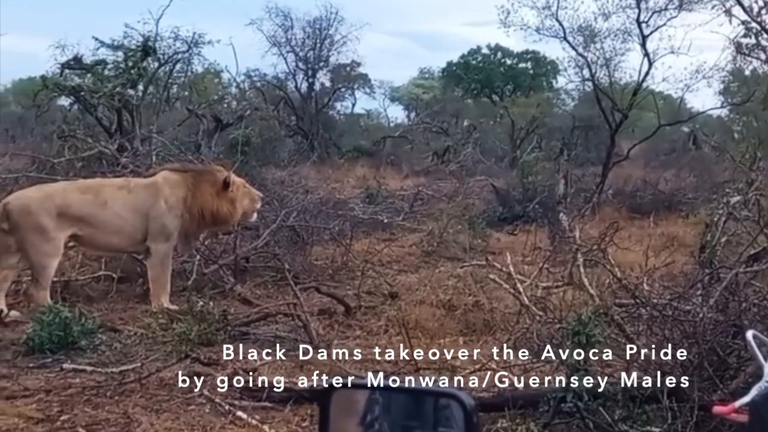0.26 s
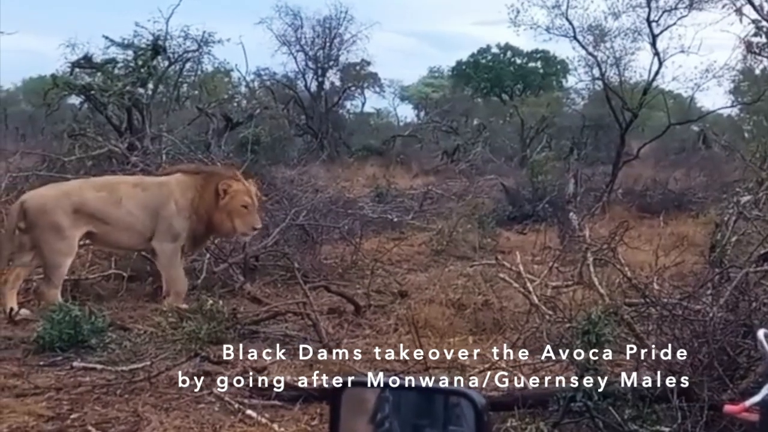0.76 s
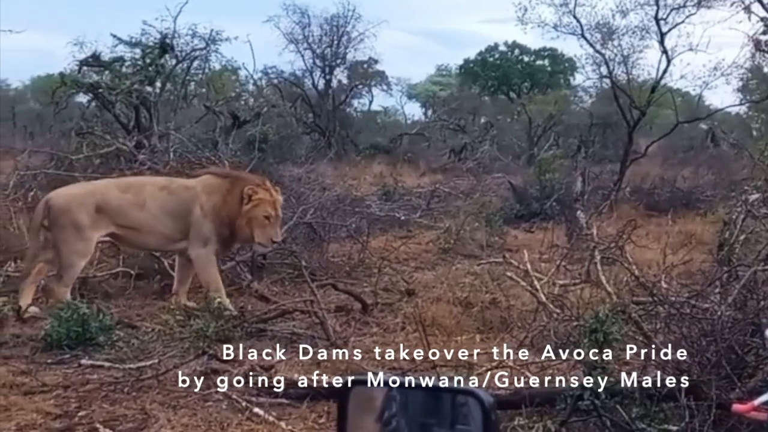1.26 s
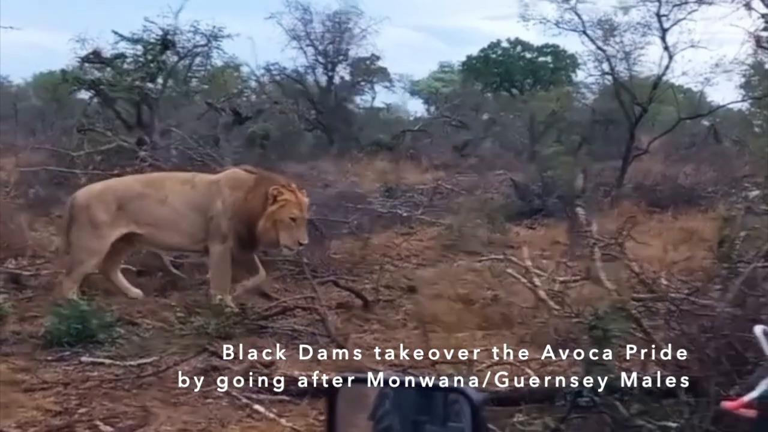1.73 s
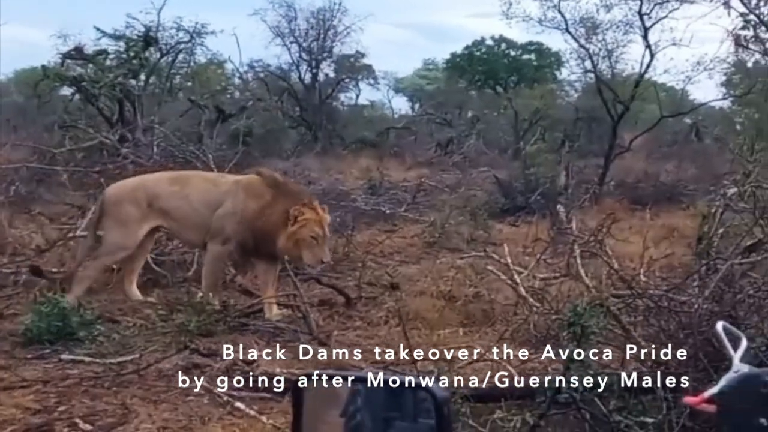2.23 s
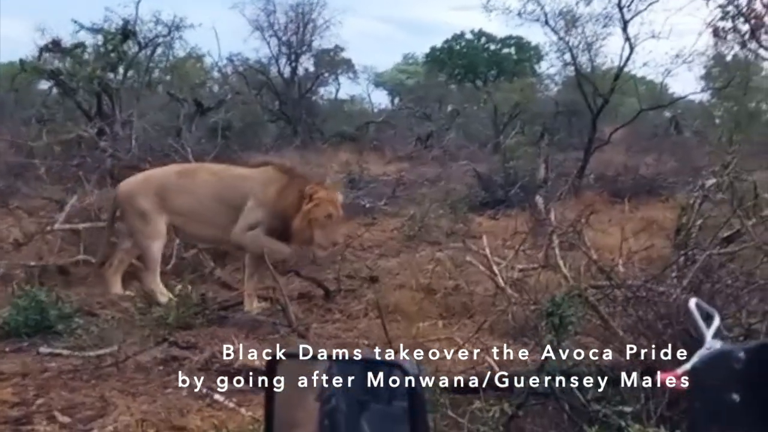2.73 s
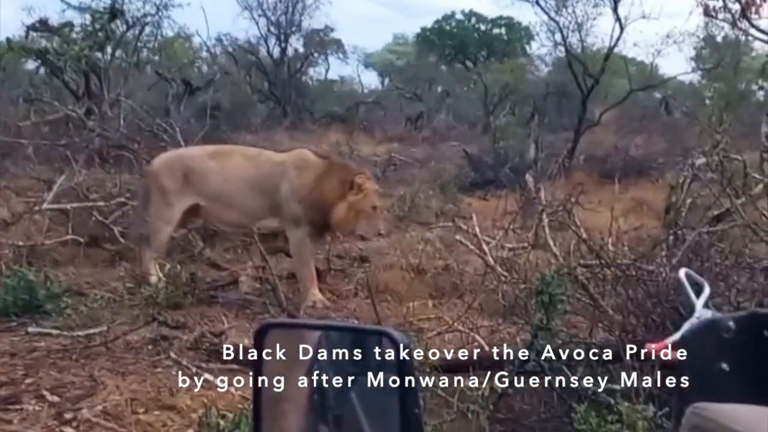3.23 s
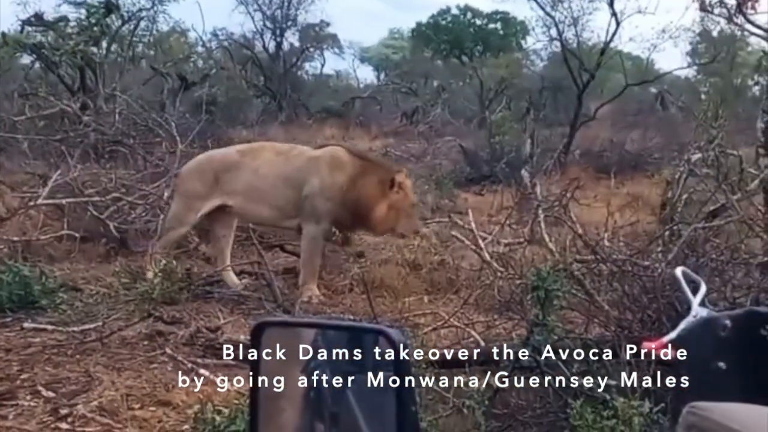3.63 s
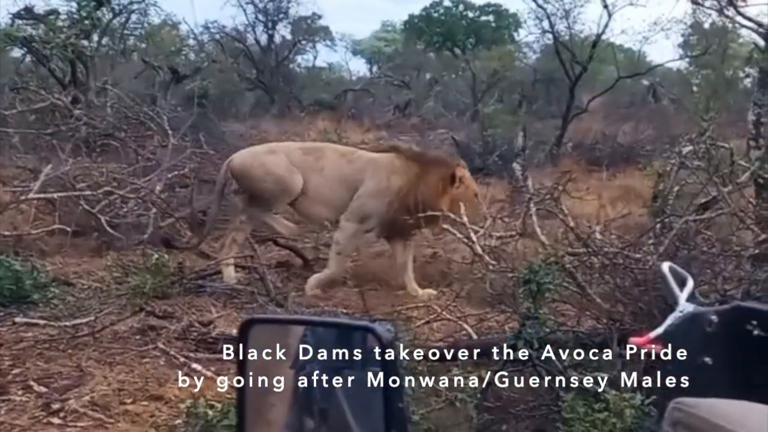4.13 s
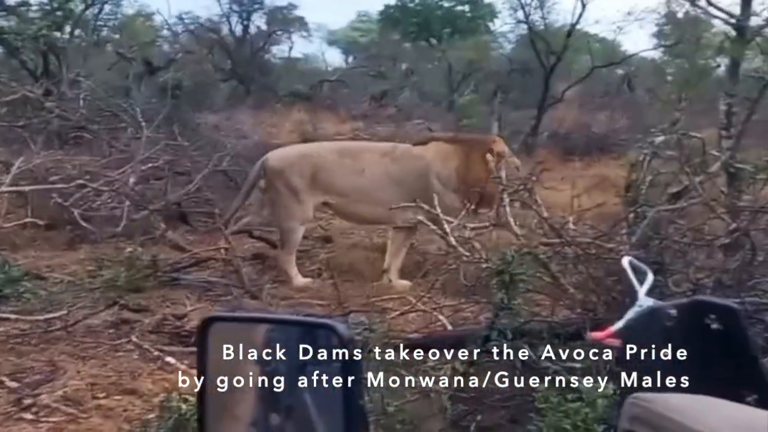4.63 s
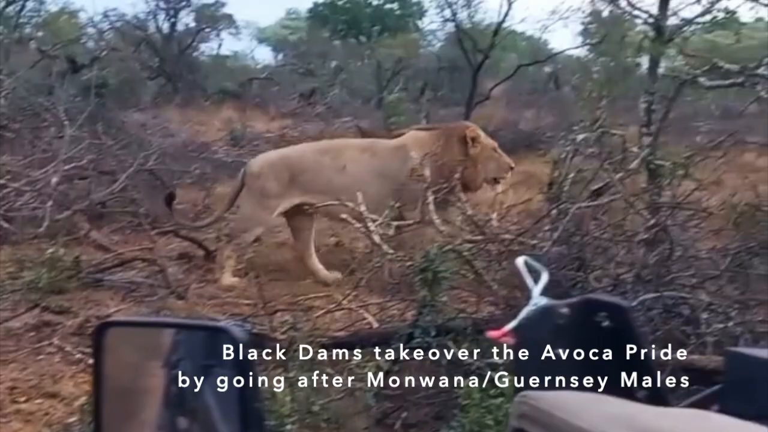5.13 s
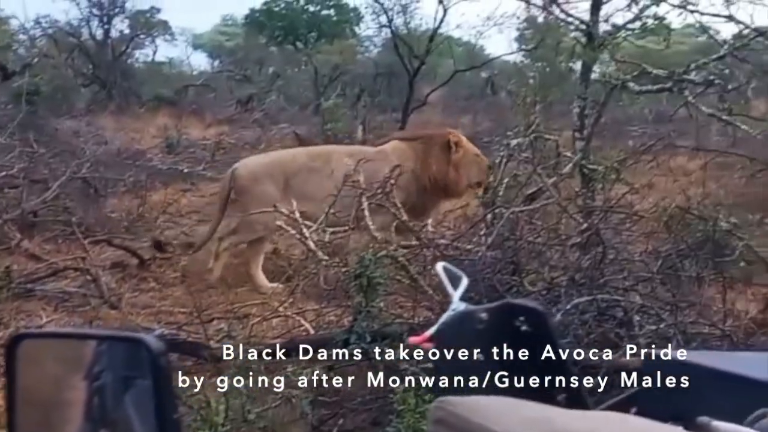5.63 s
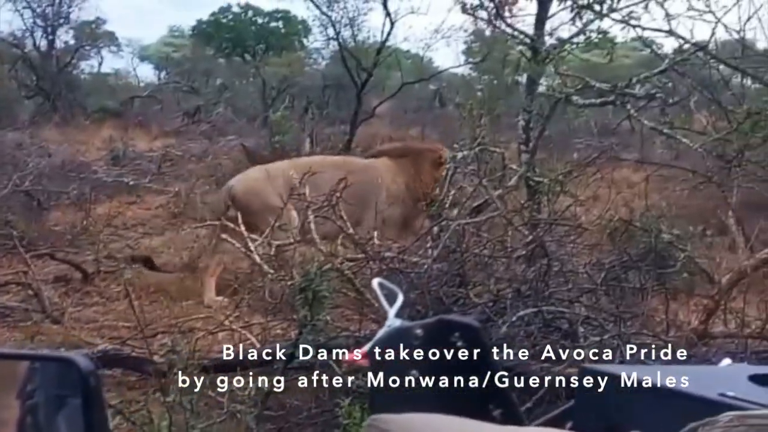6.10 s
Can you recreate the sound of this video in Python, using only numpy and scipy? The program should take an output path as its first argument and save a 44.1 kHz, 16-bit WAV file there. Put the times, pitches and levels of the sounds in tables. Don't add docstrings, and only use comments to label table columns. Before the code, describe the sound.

Close lion voices, deep and smooth in the chest with ragged edges and throaty breath, overlap in bursts with short breaks. First come falling roars and cries, then a coughing grunt, a near pause, an abrupt bark, long sinking roars, and finally a high climbing roar. Small moans and closed-mouth hums fill between. Outdoors, almost dry, with short dull tree echoes, thin insect ringing and soft hush, heard on a small microphone.

```python
import sys
import numpy as np
from scipy import signal
from scipy.fft import rfft, irfft
from scipy.io import wavfile
from scipy.ndimage import uniform_filter1d

SR = 44100
rng = np.random.default_rng(int(sys.argv[2]) if len(sys.argv) > 2 else 0)


def invert_db(level):
    return 10 ** (np.asarray(level, dtype=float) / 20)


def to_wav(s):
    ch = np.atleast_2d(s).T
    pcm = np.round(np.clip(ch, -1, 1) * 32767)
    wavfile.write(sys.argv[1], SR, pcm.astype(np.int16))


N = 280476

# start in seconds, pitch in Hz, chest tone in dB,
# mouth opening in dB against the chest.
LEADER_ROARS = [
    [(0, 188.9, -31.5, -9.5), (.21, 173.7, -26.5, -3), (.33, 163.8, -14.5, -15), (.415, 130.8, -16.5, -9.5),
     (.445, 126.4, -6.5, -21), (.55, 121.7, -9.5, -23), (.615, 107.1, -11, -23.5), (.67, 93.1, -25.5, -20),
     (.77, 105.3, -40, -24)],
    [(1.9, 201.9, -23, -24.5), (2.044, 206.8, -26, -27), (2.186, 173.2, -19, -34),
     (2.29, 153.9, -30.5, -28)],
    [(4.14, 207.3, -18.5, -34), (4.25, 178.1, -16, -37), (4.362, 159.1, -17, -29),
     (4.47, 150.9, -11.5, -32.5), (4.64, 137.2, -16, -33), (4.668, 138, -26, -31),
     (4.7, 132.1, -14.5, -38.5), (4.82, 124.4, -24, -32), (4.885, 122.9, -37, -32)],
    [(5.42, 143.6, -45, -47.5), (5.542, 150.2, -19, -43.5), (5.612, 184, -22.5, -24),
     (5.7, 260.6, -31, -28), (5.79, 274.4, -27.5, -54.5), (6.072, 264, -27, -47.5), (6.24, 277.4, -27, -26),
     (6.3, 285.6, -43.5, -7.5)],
]
# start in seconds, pitch in Hz, chest tone in dB,
# mouth opening in dB against the chest.
PARTNER_ROARS = [
    [(0, 227.2, -34, -14.5), (.21, 210.8, -26.5, -20), (.33, 206.1, -23, -12), (.42, 197.7, -29, -2.5)],
    [(.66, 273.7, -30.5, -18), (.734, 261.7, -36, -25.5), (.816, 253.5, -30, -39),
     (1.05, 217.3, -23.5, -30), (1.098, 221.2, -39.5, -19.5)],
    [(1.1, 220, -41, -11.5), (1.276, 207, -32, -21.5), (1.4, 166.7, -22.5, -31.5),
     (1.616, 156.6, -22.5, -20), (1.648, 149.9, -18.5, -28.5), (1.73, 146.7, -17.5, -36),
     (1.882, 115.5, -21.5, -23), (1.926, 144.3, -26.5, -31), (2.06, 130.6, -20.5, -35.5)],
    [(3.44, 165.9, -51, -16), (3.5, 174.3, -43.5, -10.5), (3.58, 186.1, -40, -15.5),
     (3.694, 203, -47, -26.5), (3.8, 205.4, -35, -23), (4.034, 219, -32, -20), (4.112, 233.4, -20, -31),
     (4.29, 213.7, -15.5, -40), (4.4, 187.3, -39.5, -23.5)],
    [(6.18, 133.4, -25, -32), (6.302, 219.1, -21.5, -24), (6.36, 246.2, -17.5, -29.5)],
]
LEADER_OVERTONE_DB = [-19.5, -20.5, -23, -28]
PARTNER_OVERTONE_DB = [-21.5, -28.5, -21.5, -17, -20]
LEADER_RAGGED = [.12, .28, .27, .04]
PARTNER_RAGGED = [.14, .05, .15, .16, .15]

# start in seconds, pitch in Hz, chest tone in dB,
# mouth opening in dB against the chest.
BARKS = [
    [(2.1, 95.08, -28, -24), (2.145, 96.27, -14.5, -30), (2.26, 95.03, -24, -23), (2.342, 94.1, -35.5, -17),
     (2.42, 98.34, -37.5, -14), (2.53, 93.28, -56, -17.5)],
    [(3.72, 98.7, -22.5, -34.5), (3.76, 102.9, -19, -25), (3.822, 109.4, -8, -28.5),
     (3.86, 102.8, -20, -22.5), (3.9, 103.3, -25.5, -19), (3.97, 103, -48.5, -12)],
]
BARK_OVERTONE_DB = [-15, -16.5]
BARK_RAGGED = [.62, .42]

# start in seconds, length in seconds, peak in dB, first pitch in Hz, last pitch in Hz.
YELPS = [
    (1.09, .37, -32.5, 241.5, 214),
]
MOANS = [
    (.03, .28, -20, 136.8, 128),
    (.925, .335, -24.5, 152, 112),
    (2.655, .255, -23.5, 158, 125.6),
    (3.42, .295, -22, 158, 120.7),
    (5.125, .25, -25, 163.1, 122),
    (5.925, .29, -18.5, 147, 129.8),
]
HUMS = [
    (1.63, .24, -30.5, 274, 313.6),
    (3.38, .115, -31, 211.5, 291.3),
    (3.51, .2, -30.5, 220.5, 312),
    (3.89, .23, -26, 264, 283.3),
]
# start in seconds, length in seconds, peak in dB, first pitch in Hz, last pitch in Hz.
WHINES = [
    (0, .27, -31, 412, 383),
    (.35, 0.099, -22, 334.7, 327.4),
    (.55, .11, -33.5, 338, 326.2),
    (1.09, .13, -42, 260, 350),
    (1.97, .12, -53.5, 2257, 2225),
    (5.66, 0.3, -53, 80, 84.2),
    (6.02, .135, -64, 1352, 1371),
    (6.16, .14, -40, 463, 451),
    (6.305, .055, -18, 210, 199),
]
YELP_SHAPE = dict(attack_share=.4, rise_db=-0.5, release_share=0.9, droop_db=-0.5, fade_db=6, overtone_db=-16, opening_db=-23.5)
MOAN_SHAPE = dict(attack_share=0.37, rise_db=18.5, release_share=0.28, droop_db=5, fade_db=13, overtone_db=-26.5, opening_db=-61)
HUM_SHAPE = dict(attack_share=0.37, rise_db=21, release_share=0.9, droop_db=1.5, fade_db=14, overtone_db=-23.5, opening_db=-40)
WHINE_SHAPE = dict(attack_share=0.22, rise_db=11.5, release_share=0.41, droop_db=2.5, fade_db=9.5, overtone_db=0, opening_db=0)

# time in seconds, jaws wide from 0 up, head raised from 0 to 1.
JAWS = [(0, 0, .1), (.25, .2, .15),(.38, .9, 0), (.66, 1.1, 0.32), (.8, .05, .05), (1.9, .1, 0.5),
        (2.12, 0.7, 0.7), (2.45, 0.5, 0.6), (3.7, .05, 0.2), (3.74, 2.15, 0.01), (3.9, 1.4, 0.8),
        (3.96, 0.1, 0.5), (4.1, .15, 0.7), (4.5, .3, 0.96), (4.85, 0.4, 1), (5.4, .05, 0.14),
        (6.14, .05, 0.11), (6.25, .15, .7)]
# frequency in Hz, width in Hz, level in dB.
MOUTH = [(1038, 66, 1.5), (1163, 180, -2), (1331, 110, -4.5)]
GAPE = [(757, 130, -1), (936.3, 86, 5)]
LIFT = [(1545, 240, 1), (1784, 110, 0), (1935, 280, -9.5)]
THROAT = [(536, 69, 0.5)]
# frequency in Hz, width in Hz, level in dB.
RASP = [(2110, 250, 2.5), (2700, 54, -3.5), (3970, 540, -5)]
TEETH = [(4540, 340, 0), (5200, 1000, -11.5), (6920, 1000, -7.5), (8500, 1900, -18)]
SPRAY = [(4440, 290, -.5)]
# centre in seconds, spread in seconds, rasp
# in dB, hiss in dB.
AIR_SWELLS = [
    (.635, 0.038, -51.5, -63.5),
    (2.239, 0.13, -53, -63.5),
    (3.52, 0.1, -76.5, -67.5),
    (3.771, .05, -67, -61),
    (4.8, .05, -56, -68.5),
]

# delay in seconds, level in dB.
ECHOES = [(.031, -14.5), (0.057, -16), (.094, -24), (0.142, -24.5), (0.209, -42.5)]
# time in seconds, level in dB.
TWIG = (2.91, -67.5)
# frequency in Hz, density in dB per Hz.
FLOOR = [(30, -0.5), (114, 8), (417, -21), (5300, -35.5), (7000, -26.5), (11000, -29), (12100, -41),
         (13500, -29)]


def rms_one(x):
    return x / np.sqrt(np.mean(x ** 2) + 1e-20)


def in_time(rows):
    s, *columns = np.transpose(rows)
    return [np.interp(np.arange(N) / SR, s, c) for c in columns]


def wobble(hz):
    low_pass = signal.butter(2, hz, fs=SR, output="sos")
    return rms_one(signal.sosfilt(low_pass, rng.standard_normal(N)))


def band(x, low_hz, high_hz, order=2):
    return signal.sosfilt(signal.butter(order, [low_hz, high_hz], "band", fs=SR, output="sos"), x)


def resonate(x, modes, patchy_db, turn=1):
    out = 0
    for k, (hz, width, db) in enumerate(modes):
        r = np.exp(-np.pi * 1.5 * width / SR)
        b = (1 - r * r) / 2 * np.array([1, 0, -1])
        a = [1, -2 * r * np.cos(2 * np.pi * hz / SR), r * r]
        ringing = signal.lfilter(b, a, signal.lfilter(b, a, x))
        out = out + turn ** k * invert_db(db + patchy_db * wobble(9)) * ringing
    return out


def gate(calls):
    sounding = np.zeros(N)
    for call in calls:
        sounding[round(call[0][0] * SR):round(call[-1][0] * SR)] = 1
    return sounding


def lion(calls, fall_db, mouth_db, haze_share):
    calls = sorted(calls, key=lambda call: call[0][0])
    pitch, chest_db, second_db, open_db, rough = in_time(np.vstack(calls))
    sounding = uniform_filter1d(gate(calls), size=600, mode="nearest")
    sounding = uniform_filter1d(sounding, size=600, mode="nearest")

    jitter = .004 * wobble(14) + .05 * rough * wobble(60)
    phase = 2 * np.pi * np.cumsum(pitch * (1 + jitter)) / SR
    chest = invert_db(chest_db) * np.sin(phase) * (1 + 0.55 * rough * wobble(45))
    haze = np.clip(haze_share * rough, 0, .9)
    for k in range(2, 5):
        shut = 1 / (1 + (k * pitch / 630) ** 12)
        level = shut * invert_db(second_db - fall_db * (k - 2.5))
        chest += level * np.sin(k * phase + k) * (1 - haze + haze * wobble(40))

    closing = np.diff(np.floor(phase / (2 * np.pi)), prepend=0) * np.sqrt(SR / pitch)
    cycle = (1 + np.cos(phase)) ** 2 / 2
    source = (1 - rough) * closing + 2.0 * rough * cycle * rng.standard_normal(N)
    source = source / np.hypot(1 - rough, 2.4 * rough)

    gape, lift = in_time(JAWS)
    mouth = resonate(source, MOUTH, 2.5, -1)
    mouth = mouth + gape * resonate(source, GAPE, 2.5, -1)
    mouth = mouth + lift * resonate(source, LIFT, 3)
    mouth -= resonate(source, THROAT, 2.5) / (1 + 1.5 * gape)
    mouth = invert_db(open_db + mouth_db) * rms_one(mouth) / np.sqrt(1 + gape + .5 * lift)
    return sounding * (np.sqrt(2) * chest + mouth), sounding * cycle * invert_db(open_db)


def roar(rows, overtone_db, ragged):
    s, pitch, chest_db, opening_db = np.transpose(rows)
    slide = np.abs(np.gradient(np.log(pitch), s))
    rough = np.clip(ragged + .08 * slide, 0, .8)
    peak_db = chest_db.max()
    second_db = overtone_db + peak_db + .7 * (chest_db - peak_db)
    return np.transpose([s, pitch, chest_db, second_db, chest_db + opening_db, rough])


def cries(rows, ragged, attack_share, rise_db, release_share, droop_db, fade_db, overtone_db, opening_db):
    share = np.array([0, attack_share, max(1 - release_share, attack_share + .1), 1])
    loss_db = np.array([rise_db, 0, droop_db, fade_db])
    opening = opening_db + 5.5 * share
    calls = []
    for s, length, db, first, last in rows:
        pitch = first + (last - first) * share
        score = np.transpose([s + length * share, pitch, db - loss_db, opening])
        calls.append(roar(score, overtone_db, ragged))
    return calls


def whines():
    calls = cries(WHINES, 0, **WHINE_SHAPE)
    pitch, level_db = in_time(np.vstack(calls)[:, :3])
    sounding = uniform_filter1d(gate(calls), size=900, mode="nearest")
    tone = np.sin(2 * np.pi * np.cumsum(pitch) / SR)
    return np.sqrt(2) * sounding * invert_db(level_db) * tone * (1 + 0.36 * wobble(33))


def breath(beat):
    flow = np.abs(uniform_filter1d(beat, size=2000))
    lift = np.clip(in_time(JAWS)[1], 0, 1.5)
    levels = flow * invert_db([-28 + 26.5 * lift, -37 + 24 * lift])
    for s, spread, *db in AIR_SWELLS:
        puff = np.exp(-.5 * ((np.arange(N) / SR - s) / spread) ** 2)
        levels = levels + invert_db(db)[:, None] * puff
    return 20 * np.log10(levels + 1e-9)


def rasp(cycles, modes, level_db, apart, pan_db):
    throb = .8 + .25 * cycles / (uniform_filter1d(cycles, size=2000) + 1e-6)
    mid, side = rng.standard_normal((2, N))
    air = (mid + apart * side * [[1], [-1]]) * throb * invert_db(1.5 * wobble(12))
    return invert_db(level_db) * rms_one(resonate(air, modes, 2.9)) * invert_db([[pan_db / 2], [-pan_db / 2]])


def place(x, pan_db, lag):
    late = np.interp(np.arange(N) - lag, np.arange(N), x)
    return np.array([late * invert_db(pan_db / 2), x * invert_db(-pan_db / 2)])


def bush(x):
    dull = band(x, 46, 670, order=1)
    out = np.zeros((2, N))
    for s, db in ECHOES:
        for side, stretch in enumerate((1.012, 1)):
            lag = round(s * stretch * SR)
            out[side, lag:] += invert_db(db) * dull[:-lag]
    return out


def twig():
    snap_s, level_db = TWIG
    since = np.arange(N) / SR - snap_s
    dying = (since > 0) * invert_db(level_db - 60 * np.abs(since) / 0.027)
    return dying * band(rng.standard_normal((2, N)), 3500, 15500)


def insects(level_db):
    struck = rng.random((2, N)) < 1500 / SR
    clicks = struck * rng.standard_normal((2, N)) * invert_db(0.25 * wobble(90))
    wings = [(3879, 61, -4), (4036, 230, -1)]   # Hz, width Hz, dB
    song = resonate(clicks + 0.045 * clicks[::-1], wings, 1.6)
    return invert_db(level_db) * rms_one(song) * invert_db([[1.7], [-1.7]])


def floor(level_db):
    hz = np.fft.rfftfreq(N, 1 / SR) + 1
    points = np.array(FLOOR)
    colour = invert_db(np.interp(np.log(hz), np.log(points[:, 0]), points[:, 1]))
    mid, side = rfft(rng.standard_normal((2, N))) * colour
    alike = 1 / (1 + (hz / 1500) ** 2)
    pair = irfft(np.sqrt(1 + alike) * mid + np.sqrt(1 - alike) * side * [[1], [-1]], N)
    return invert_db(level_db) * rms_one(pair) * invert_db(0.47 * wobble(21)) * invert_db([[1.5], [-1.5]])


def scene():
    leader_calls = list(map(roar, LEADER_ROARS, LEADER_OVERTONE_DB, LEADER_RAGGED))
    leader_calls += cries(YELPS, .36, **YELP_SHAPE) + cries(HUMS, .1, **HUM_SHAPE)
    partner_calls = list(map(roar, PARTNER_ROARS, PARTNER_OVERTONE_DB, PARTNER_RAGGED))
    grunter_calls = cries(MOANS, .15, **MOAN_SHAPE)
    grunter_calls += list(map(roar, BARKS, BARK_OVERTONE_DB, BARK_RAGGED))

    leader, leader_beat = lion(leader_calls, fall_db=9.0, mouth_db=2.5, haze_share=1.4)
    partner, partner_beat = lion(partner_calls, fall_db=10.0, mouth_db=4.0, haze_share=1.3)
    grunter, grunter_beat = lion(grunter_calls, fall_db=10.0, mouth_db=3.0, haze_share=2.4)
    leader = leader + whines()
    pride = place(leader, 0.96, lag=3.0) + place(partner, 0.97, lag=5.3) + place(grunter, 2.4, lag=-1.5)

    beat = leader_beat + partner_beat + grunter_beat
    rasp_db, hiss_db = breath(beat)
    air = rasp(beat, RASP, rasp_db, apart=.6, pan_db=1.5)
    air += rasp(beat, TEETH, hiss_db, apart=.9, pan_db=8.0)
    air += in_time(JAWS)[0] * rasp(beat, SPRAY, hiss_db - 0.5, apart=.9, pan_db=6.5)

    echoes = bush(leader + partner + grunter)
    return pride + air + echoes + insects(level_db=-57.5) + floor(level_db=-57) + twig()


def top_cut(x):
    return signal.sosfilt(signal.butter(12, 15660, fs=SR, output="sos"), x)


def record(dry):
    thin = signal.sosfilt(signal.butter(4, 78, "high", fs=SR, output="sos"), dry)
    return top_cut(thin)


dry = scene()
out = record(dry)
to_wav(out)
```